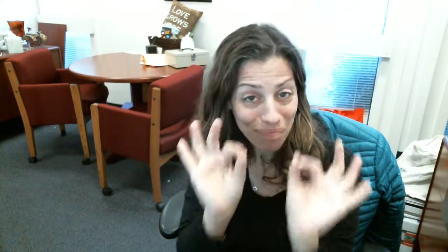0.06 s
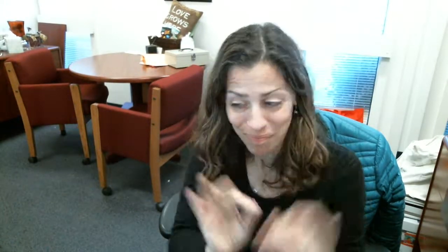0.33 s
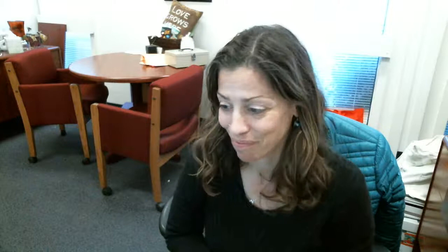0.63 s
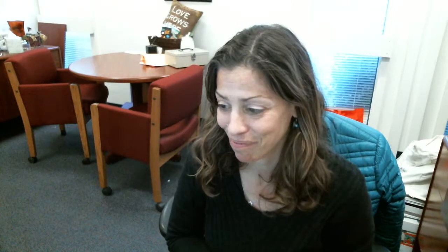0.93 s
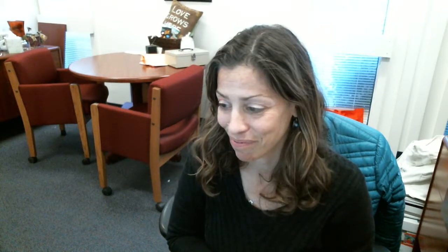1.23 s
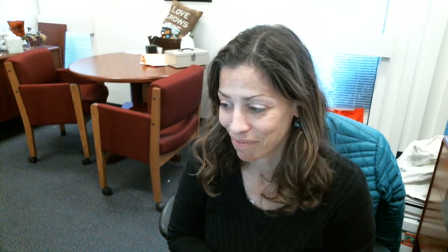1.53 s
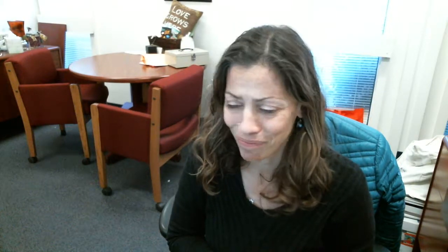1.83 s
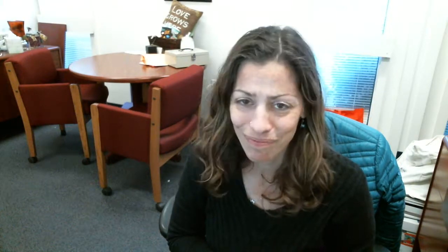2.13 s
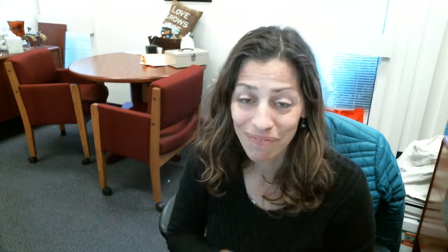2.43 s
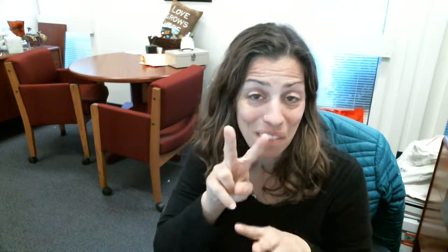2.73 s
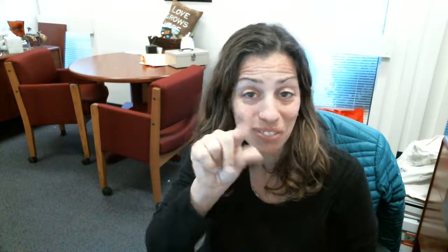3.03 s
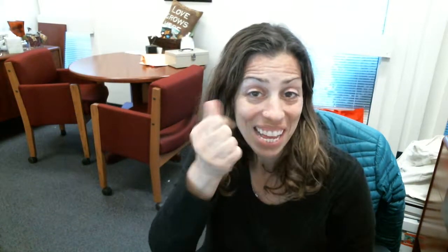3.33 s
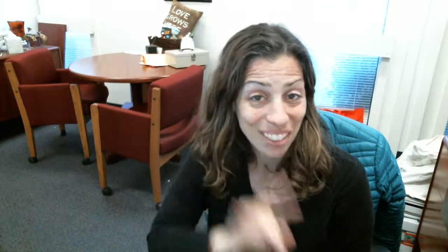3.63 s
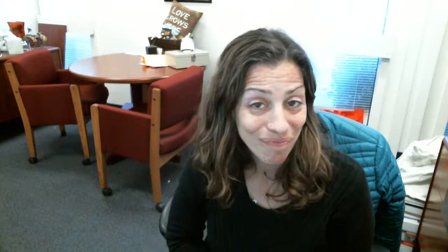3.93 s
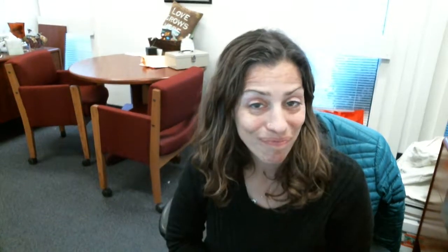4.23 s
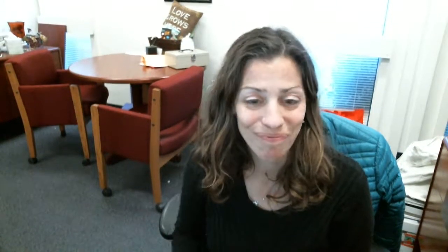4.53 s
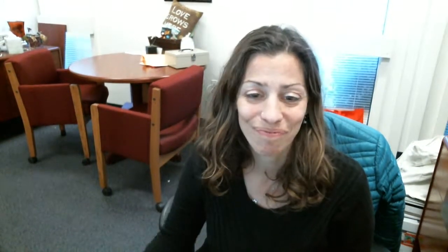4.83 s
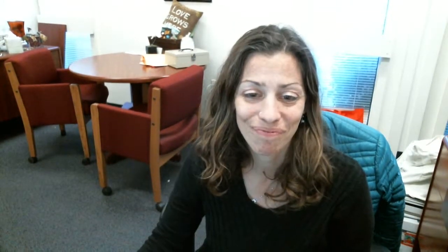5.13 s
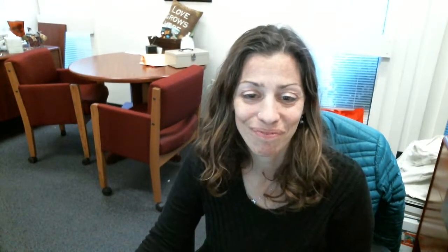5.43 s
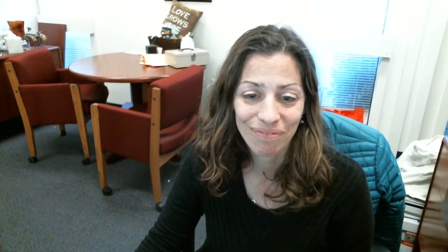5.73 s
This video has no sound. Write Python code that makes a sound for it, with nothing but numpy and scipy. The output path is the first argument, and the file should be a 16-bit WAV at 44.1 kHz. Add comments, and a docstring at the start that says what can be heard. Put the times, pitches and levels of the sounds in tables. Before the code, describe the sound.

A person gestures near a small microphone in a quiet office, making sparse finger ticks and brief sleeve swishes over a low ventilation hum. A soft bump and a couple of crisp clicks lead to a loud knock as an arm comes down on the desk, which rings and rattles briefly. Afterwards a hand scuffs and lightly taps the desk top while the air keeps murmuring.

```python
"""Gestures at an office desk

Someone moves in a quiet carpeted office, close to a small microphone, as ventilation murmurs and hums.
Fingers and joints tick, soft low blips rise out of the rumble, sleeves swish and a hand scuffs the desk.
Then a forearm lands with a loud knock that makes the desk ring, and things on top rock."""
import sys
import numpy as np
from scipy import signal
from scipy.fft import rfft, irfft
from scipy.io import wavfile
from scipy.ndimage import uniform_filter1d

SR = 44100
rng = np.random.default_rng(int(sys.argv[2]) if len(sys.argv) > 2 else 0)


def wav_record(signal):
    """Record a signal, one row per channel, as 16-bit PCM in the file named by sys.argv[1]."""
    frames = np.transpose(np.atleast_2d(signal))
    bounded = np.clip(frames, -1, 1)
    # unit amplitude maps onto the largest positive 16-bit level
    quanta = np.round(bounded * 32767).astype(np.int16)
    wavfile.write(sys.argv[1], SR, quanta)


N = 254456
TIME = np.arange(N) / SR
SHORT = TIME[:SR // 2]   # half a second, for brief sounds


def from_db(db):
    """Turn decibels (dB) into a number to multiply a sound by."""
    return 10 ** (np.asarray(db) / 20)


def rms_one(x):
    """Scale a sound so that its average power is one."""
    return x / np.sqrt(np.mean(x ** 2) + 1e-30)


def at_hz(points, hz):
    """Read between the rows of a table, with octaves evenly spaced."""
    f, value = np.transpose(points)
    return np.interp(np.log(hz + 1e-3), np.log(f), value)


def cut(x, hz, kind, order):
    """Keep the lows, the highs or a band; a higher order cuts more sharply."""
    edges = np.sort(np.clip(hz, 10, .45 * SR), axis=None).squeeze()
    return signal.sosfilt(signal.butter(order, edges, kind, fs=SR, output="sos"), x + 1e-18)


def noise(spectrum, size):
    """Noise shaped by a table of frequencies and levels."""
    gains = from_db(at_hz(spectrum, np.fft.rfftfreq(size, 1 / SR)))
    return rms_one(irfft(rfft(rng.standard_normal(size)) * gains, size))


def drift(rate):
    """A curve that wanders to a new random value `rate` times a second."""
    knots = rng.standard_normal(int(N / SR * rate) + 2)
    return rms_one(np.interp(TIME * rate, np.arange(len(knots)), knots))


def dying(t60):
    """A fade that falls by 60 dB in t60 seconds."""
    return from_db(-60 * SHORT / t60)


def add(track, s, sound):
    """Mix a sound in, starting at s seconds."""
    start = max(round(s * SR), 0)
    track[start:start + len(sound)] += sound[:N - start]


def ventilation(air_db, hum_gain_db, flutter_db, waver):
    """Moving air makes a fluttering rumble; the fan and mains power add faint, wavering tones."""
    # Each row: frequency in Hz, relative level of the air noise in dB.
    air_shape = [(20, -24), (40, -15), (70, -7.5), (110, -7), (180, 1.5), (270, -4.5), (450, -8.5),
                 (800, -15), (1500, -20), (3000, -25), (5500, -28.5), (10000, -31.5), (12500, -39),
                 (15500, -38)]
    # Each row: pitch of a tone in Hz, level in dB before hum_gain_db is added.
    tones = [(118.4, -76.5), (236.9, -78.5), (263.8, -79), (355.3, -85), (640.6, -85), (1890, -89),
             (2735, -92.5)]
    air = from_db(air_db) * noise(air_shape, N)
    air += cut(air, 810, "low", order=1) * (from_db(flutter_db * drift(21)) - 1)
    hum = sum(from_db(db) * np.sqrt(2) * np.sin(2 * np.pi * hz * TIME + waver * drift(2))
              for hz, db in tones)
    return air + from_db(hum_gain_db) * hum


def ticks(snap_db, snap_t60, edge_db):
    """Fingers, joints and jewellery snap: a very short ring with a brief rasp."""
    # Fingers meet, part and land. Each row: start in seconds, peak level in dB.
    finger_ticks = [(0.157, -56), (0.177, -49), (0.183, -46), (0.268, -58), (0.340, -52), (0.352, -52),
                    (0.592, -36.5), (1.352, -55), (3.316, -24.5), (3.636, -55), (3.835, -40), (3.843, -29),
                    (3.846, -25), (3.8514, -30), (3.859, -38), (3.883, -31), (3.887, -36)]
    # Joints and jewellery click. Each row: start in seconds, peak level in dB, pitch in Hz.
    clicks = [(2.755, -52.5, 6040), (2.771, -54.5, 9750), (2.784, -61.5, 3950), (2.852, -48.5, 5030),
              (3.4857, -42, 2630), (3.4865, -24, 9580), (3.4866, -54.5, 750), (3.5354, -50.5, 3120),
              (3.8448, -40, 4150), (3.948, -47.5, 3330)]
    finger_hz, finger_width_hz, pitch_over_width = 8690, 2960, 6.9
    dry = [(s, db, finger_hz, finger_width_hz) for s, db in finger_ticks]
    pitched = [(s, db, hz, hz / pitch_over_width) for s, db, hz in clicks]
    out = np.zeros(N)
    for s, peak_db, hz, width_hz in dry + pitched:
        ping = np.sin(2 * np.pi * hz * SHORT) * np.exp(-np.pi * width_hz * SHORT)
        snap = from_db(snap_db) * rng.standard_normal(len(SHORT)) * dying(snap_t60)
        snap[0] = 1
        reach_hz = 0.017 * hz + 0.55 * width_hz   # a shorter ring spreads over more frequencies
        ring = signal.fftconvolve(snap, ping)[:len(SHORT)]
        ring = cut(ring, [hz - reach_hz, hz + reach_hz], "band", order=2)
        edge = cut(snap, [hz * 0.665, min(hz * 2.0, 11000)], "band", order=4)
        tick = ring / np.abs(ring).max() + from_db(edge_db) * edge / np.abs(edge).max()
        add(out, s, from_db(peak_db) * tick / np.abs(tick).max())
    return out


def faint_blips(count, per_second, level_db, spread_db, low_hz, high_hz):
    """Faint, short low blips at random times, levels and pitches."""
    wait, size, pitch = rng.random((count, 3)).T
    times = np.cumsum(2 * wait / per_second)
    levels = level_db + spread_db * (2 * size - 1)
    pitches = low_hz * (high_hz / low_hz) ** pitch
    return [row for row in zip(times, levels, pitches) if row[0] < TIME[-1]]


def low_blips(t60, rise_s):
    """Soft low blips swell quickly out of the background rumble and fade."""
    # The louder blips. Each row: start in seconds, peak level in dB, pitch in Hz.
    louder = [(0.223, -55.5, 240), (0.394, -49.5, 228), (0.515, -52.5, 232), (0.693, -54.5, 120),
              (1.117, -47, 130), (1.257, -54, 233), (2.089, -49.5, 177.6), (2.256, -53.5, 129),
              (2.326, -52, 265), (2.554, -52.5, 365), (2.603, -52.5, 139), (2.996, -52, 253),
              (3.16, -52.5, 123), (5.407, -53.5, 127), (5.67, -53.5, 124)]
    faint = faint_blips(count=40, per_second=3.6, level_db=-59, spread_db=2.5, low_hz=201, high_hz=519)
    out = np.zeros(N)
    for s, level_db, hz in louder + faint:
        swell = (1 - np.exp(-SHORT / rise_s)) ** 2
        blip = np.sin(2 * np.pi * hz * SHORT) * dying(t60) * swell
        add(out, s, from_db(level_db) * blip / np.abs(blip).max())
    return out


def rubs(strokes, grain_db, grain_rate, fringe_db, order):
    """Countless fibres catch and slip; the hiss swells and fades with the speed of each stroke."""
    out = np.zeros(N)
    catching = from_db(grain_db * drift(grain_rate))
    for s, level_db, rise, fall, low_hz, high_hz in strokes:
        speed = np.exp(-.5 * ((TIME - s) / np.where(TIME < s, rise, fall)) ** 2)
        slips = rng.standard_normal((2, N)) * catching
        core = rms_one(cut(slips[0], [low_hz, high_hz], "band", order=order))
        # The finest slips reach higher.
        fringe = rms_one(cut(slips[1], [low_hz, high_hz * 1.05], "band", order=2))
        out += from_db(level_db) * speed * (core + from_db(fringe_db) * fringe)
    return out


def swishes(top_hz):
    """Sleeves and skin slide with a high hiss; a broader contact reaches lower."""
    # Each row: fastest moment in seconds, level in dB, rise and fall in seconds, lower edge in Hz.
    slides = [(0.45, -77.5, 0.11, 0.07, 3500), (0.566, -61, 0.0025, 0.014, 6840),
              (0.594, -56.5, 0.019, 0.027, 5420), (2.530, -66, 0.02, 0.03, 6300),
              (2.576, -52.5, 0.013, 0.012, 6120), (3.250, -64.5, 0.023, 0.024, 8150),
              (3.258, -68.5, 0.031, 0.029, 4800), (3.419, -61.5, 0.0065, 0.024, 7360),
              (3.432, -64.5, 0.015, 0.009, 2800), (3.497, -60, 0.008, 0.0061, 1210),
              (3.505, -65, 0.017, 0.028, 9060), (3.876, -48, 0.016, 0.024, 4900),
              (4.415, -66, 0.016, 0.016, 7100), (4.473, -54, 0.0057, 0.017, 6400),
              (4.74, -81, 0.46, 0.12, 4000), (4.945, -71.5, 0.003, 0.045, 3540),
              (5.097, -71.5, 0.011, 0.016, 5600)]
    strokes = [(*row, top_hz) for row in slides]
    return rubs(strokes, grain_db=0.0, grain_rate=900, fringe_db=-5.5, order=5)


def scuffs(width_hz, fall_over_rise):
    """A hand shifts over the desk top with a coarser rub, in a narrow middle band."""
    # Each row: fastest moment in seconds, level in dB, rise in seconds, lower edge in Hz.
    shifts = [(2.566, -68.5, 0.0083, 950), (2.635, -62.5, 0.0037, 330), (4.424, -64, 0.01, 300),
              (4.500, -66.5, 0.019, 297), (4.652, -69, 0.0056, 1010), (4.753, -63.5, 0.008, 1300),
              (4.949, -65, 0.009, 1270), (5.105, -54.5, 0.01, 860), (5.235, -57, 0.0071, 222),
              (5.430, -69, 0.0066, 920)]
    strokes = [(s, db, rise, fall_over_rise * rise, low_hz, low_hz + width_hz)
               for s, db, rise, low_hz in shifts]
    return rubs(strokes, grain_db=0.5, grain_rate=300, fringe_db=-9.5, order=3)


def knocks(crack_db, crack_t60, push_db, spread_db, damping, settle_s):
    """Each blow gives a push, a short crack and the desk's own tones, which the resting arm muffles."""
    # Each row: start in seconds, level in dB, frequency in Hz above which the blow is dulled.
    blows = [(3.272, -35, 1290), (3.294, -39.5, 1120), (3.844, -42, 4800), (3.8517, -35, 2600),
             (3.858, -26, 3440), (3.865, -24.5, 780), (3.876, -27.5, 2500), (3.900, -36, 1280),
             (3.919, -44, 3580), (3.9534, -34.5, 930), (3.9853, -40, 1200), (4.063, -45, 590),
             (4.082, -51.5, 530), (4.105, -59.5, 520), (5.104, -51, 760), (5.433, -54, 620)]
    # Each row: pitch in Hz, relative level in dB, seconds to fade by 60 dB before damping.
    desk_tones = [(88.4, -14, 0.59), (139.7, 2, 0.16), (194, -10.5, 1), (242, 5.5, 0.34), (308, -6.5, 0.14),
                  (337.2, -7.5, 0.51), (420, -12, 0.23), (510, -0.5, 0.061), (545.4, -7.5, 0.27),
                  (605, -3.5, 0.18), (756, -16, 0.036), (748, -36, 0.43), (807, -10, 0.16), (871, -8, .18),
                  (939, -13, 0.26), (991, -15, 0.77), (990, -21, 0.089), (1150, -32, 0.3),
                  (1260, -8.5, 0.14), (1448, -16, 0.21), (1543, -8, 0.09), (1620, -15, 0.14),
                  (2140, -17, 0.084)]
    # The desk's crowded upper tones. Each row: frequency in Hz, relative level in dB.
    crack_shape = [(150, -11), (400, 11.5), (1000, 7), (2000, -0.5), (3500, -1), (6000, -8), (15000, -15)]
    full_blow_db, db_per_octave = -26.5, 6.5
    hz, tone_db, t60 = np.transpose(desk_tones)[:, :, None]
    tones = np.sin(2 * np.pi * hz * SHORT) * dying(t60 / damping) * from_db(tone_db)
    signs = (-1) ** np.arange(len(desk_tones))   # neighbouring tones swing against each other
    out = np.zeros(N)
    for s, level_db, bright_hz in blows:
        strengths = signs * from_db(spread_db * rng.standard_normal(len(desk_tones)))
        crack = from_db(crack_db) * noise(crack_shape, len(SHORT)) * dying(crack_t60)
        ring = strengths @ tones + crack
        ring[0] += from_db(push_db)
        ring *= np.exp(-(SHORT / settle_s) ** 2)   # fades faster as the arm settles
        # Soft flesh takes away the treble, a light touch the bass.
        low_hz = min(117 * 2 ** ((full_blow_db - level_db) / db_per_octave), 358)
        blow = cut(cut(ring, bright_hz, "low", order=4), low_hz, "high", order=2)
        opening_level = np.sqrt(np.mean(blow[:SR // 100] ** 2))
        add(out, s, from_db(level_db) * blow / opening_level)
    return out


def office(dry, tail_db, gap_s, wall_db):
    """The room adds an echo off the near wall and a tail of reflections whose treble dies first."""
    # Each row: frequency in Hz, seconds for the tail to fade by 60 dB.
    fade_times = [(100, 0.29), (500, 0.24), (1200, 0.18), (2500, 0.18), (8000, 0.084), (15000, 0.077)]
    edges = np.geomspace(50, 18000, 10)
    white = rng.standard_normal(len(SHORT))
    tail = sum(cut(white, [lo, hi], "band", order=2) * dying(at_hz(fade_times, np.sqrt(lo * hi)))
               for lo, hi in zip(edges, edges[1:]))
    tail *= np.clip(SHORT / gap_s - 1, 0, 1)   # silent for gap_s, then fades in
    out = dry + from_db(tail_db) * signal.fftconvolve(dry, tail / np.linalg.norm(tail))[:N]
    add(out, s=.0185, sound=from_db(wall_db) * dry)
    return out


def suppress(x, depth_db, threshold_db, size):
    """A noise suppressor turns down each band unless it stands out from its own usual level."""
    overlap = size - size // 4
    spectra = signal.stft(x, nperseg=size, noverlap=overlap)[2]
    power = uniform_filter1d(np.abs(spectra) ** 2, size=7, axis=0)   # smooth across bands
    power = uniform_filter1d(power, size=3, axis=1)   # then over time
    excess = power / np.median(power, axis=1, keepdims=True) / from_db(threshold_db) ** 2
    gain = from_db(-depth_db / (1 + excess ** 2))
    return signal.istft(spectra * gain, nperseg=size, noverlap=overlap)[1][:N]


def scene():
    """The movements and blips sound in one room, over the ventilation."""
    desk = knocks(crack_db=1.0, crack_t60=0.17, push_db=25.0, spread_db=4.5, damping=1.57, settle_s=0.091)
    desk = office(desk, tail_db=-19.0, gap_s=0.011, wall_db=-22)
    blips = office(low_blips(t60=0.086, rise_s=0.0046), tail_db=-24.0, gap_s=0.0057, wall_db=-31)
    fingers = ticks(snap_db=-19.5, snap_t60=0.017, edge_db=-12.0)
    fingers = office(fingers, tail_db=-8.5, gap_s=0.0046, wall_db=-27)
    sleeves = office(swishes(top_hz=10800), tail_db=-13.0, gap_s=0.0093, wall_db=-29)
    palms = office(scuffs(width_hz=757, fall_over_rise=1.55), tail_db=-13.5, gap_s=0.0033, wall_db=-29)
    air = ventilation(air_db=-61.5, hum_gain_db=5.0, flutter_db=1.1, waver=0.54)
    return (desk + blips + fingers + sleeves + palms + air)[None]


def record(dry):
    """The small microphone loses the deepest bass; faint tails are shortened and the top is cut off."""
    thin = cut(dry[0], 25, "high", order=2)
    quiet = suppress(thin, depth_db=6.5, threshold_db=6.5, size=512)
    treble_cut = signal.ellip(12, .1, 80, 15700, fs=SR, output="sos")
    return signal.sosfilt(treble_cut, quiet)[None]


dry = scene()
out = record(dry)
wav_record(out)
```